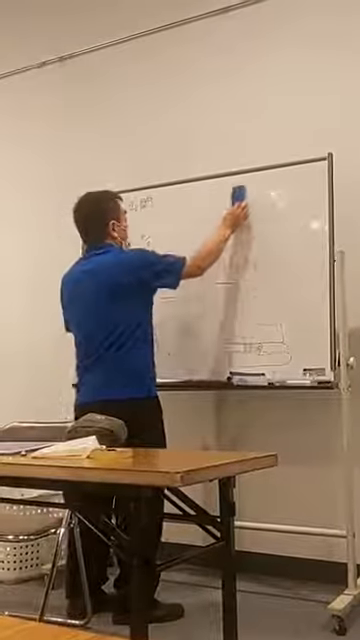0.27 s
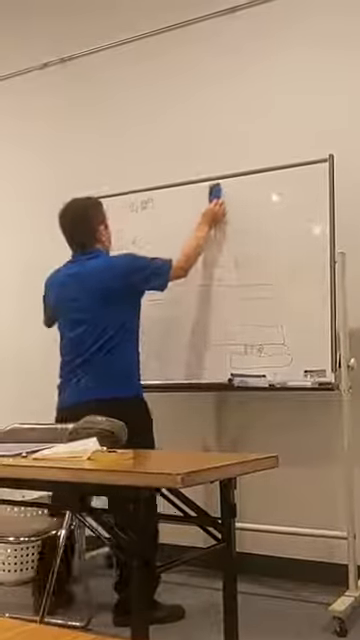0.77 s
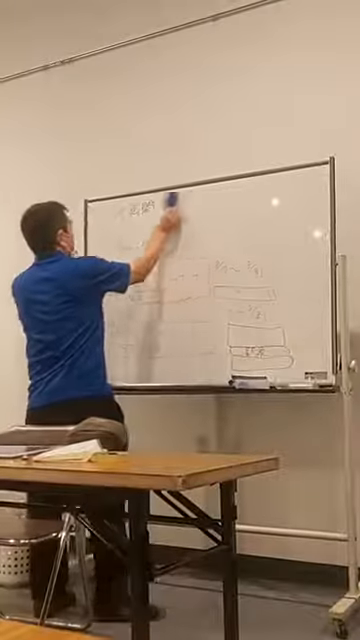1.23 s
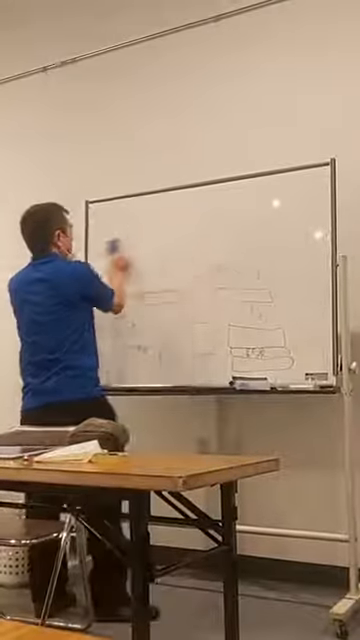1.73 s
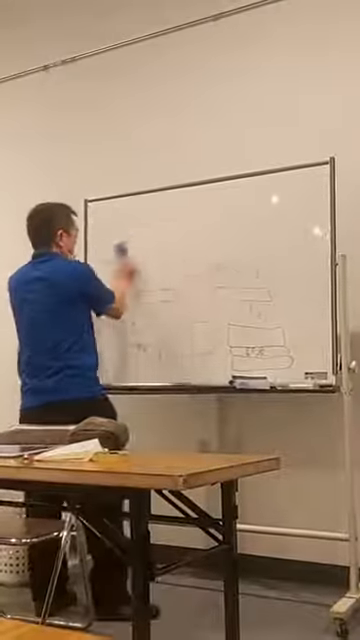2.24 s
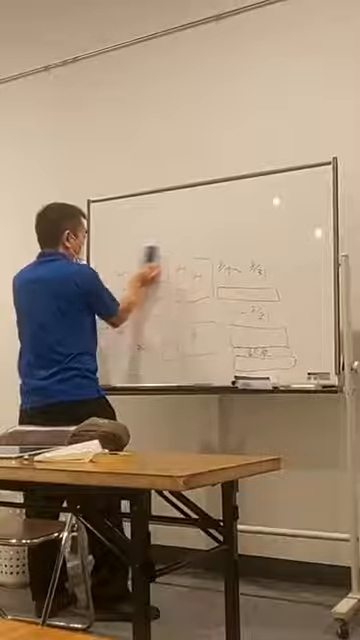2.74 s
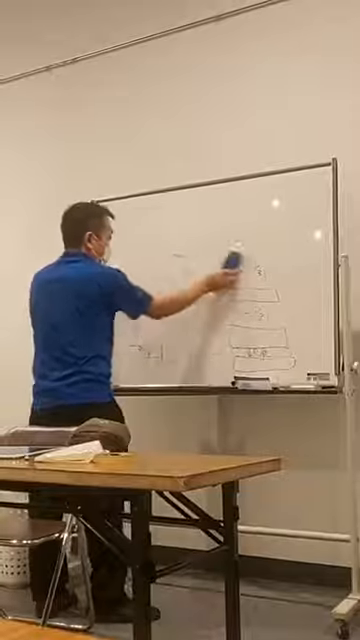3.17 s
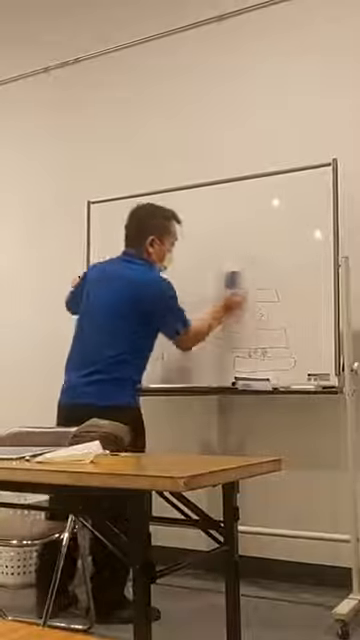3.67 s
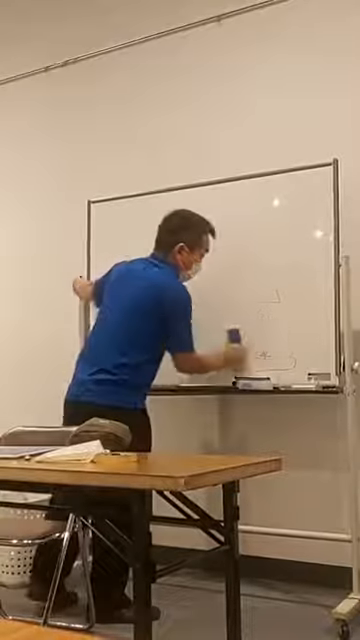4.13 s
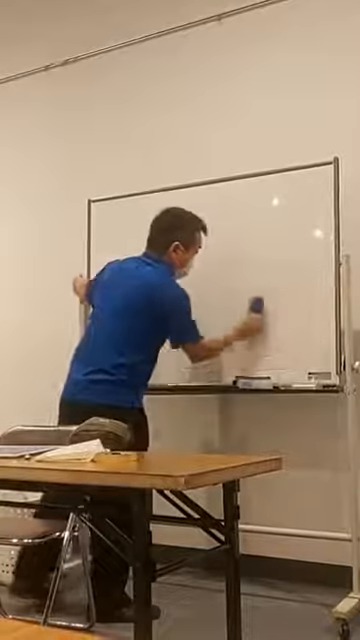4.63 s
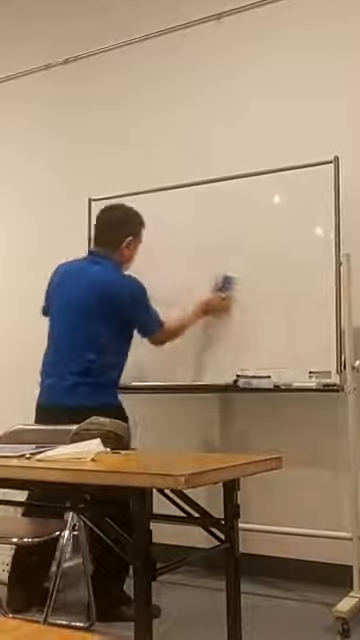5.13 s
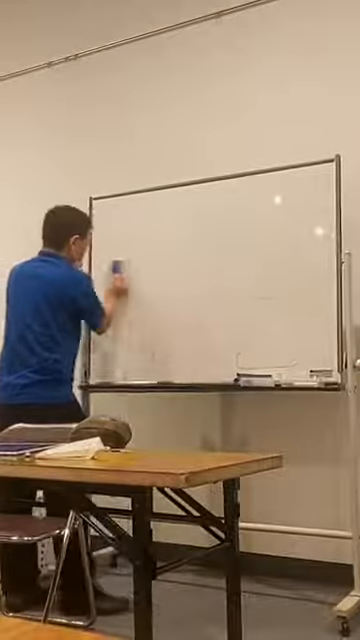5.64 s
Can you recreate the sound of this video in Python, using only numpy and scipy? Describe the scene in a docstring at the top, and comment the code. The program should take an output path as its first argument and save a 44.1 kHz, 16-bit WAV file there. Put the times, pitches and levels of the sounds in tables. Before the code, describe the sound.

Soft hissing strokes of an eraser on a whiteboard, broken by short, very high squeaks and light ticks over a low ventilation hum.

```python
"""Wiping a whiteboard

A felt eraser slaps onto a whiteboard and wipes to and fro, a few metres off in a bare, quiet meeting room.
The felt hisses with each stroke, the board thrums under it, and the eraser's hard edge ticks on the panel.
At the turns it sticks and slips in thin, very high squeaks that the hard walls draw out.
Ventilation rumble and mains hum sit below."""
import sys
import numpy as np
from scipy import signal
from scipy.fft import rfft, irfft
from scipy.io import wavfile

SR = 44100
rng = np.random.default_rng(int(sys.argv[2]) if len(sys.argv) > 2 else 0)


def generate_wav(signal):
    """Clip the signal to [-1, 1] and save it as 16-bit WAV at the path in sys.argv[1]."""
    frames = np.transpose(np.atleast_2d(signal))
    scaled = np.clip(frames, -1, 1) * 32767
    pcm = np.round(scaled).astype(np.int16)
    wavfile.write(sys.argv[1], SR, pcm)


N = 260190

# Stick-slip squeaks. Each row: start, swell and hold in seconds, peak level in dB, onset in dB below
# the peak, pitch in Hz at the onset, at the peak and at the end, pitch wobble in Hz.
SQUEAKS = [(1.350, 0.022, 0.087, -43, 16, 9390, 9220, 9220, 59),
           (1.743, .012, .004, -30, 14, 9950, 9930, 9870, 45),
           (1.758, 0.018, 0.039, -33.5, 12, 9700, 9000, 9060, 101.6),
           (2.085, 0.066, 0.069, -37, 8, 9120, 9220, 9020, 84),
           (2.460, .055, 0.0398, -35, 12, 9095, 9300, 8930, 79.4),
           (2.691, 0.029, .010, -69, 6.5, 1533, 1560, 1575, 60),
           (2.797, 0.039, 0.063, -34.5, 10.5, 9100, 9400, 9030, 96),
           (3.322, .020, .035, -62, 14, 7160, 7125, 7130, 32),
           (4.110, 0.056, 0.17, -69.5, 5, 1640, 1670, 1640, 58),
           (4.539, .025, 0.018, -71.5, 6, 1706, 1718, 1720, 45.4),
           (4.862, .010, 0.023, -49, 10, 9450, 9550, 9800, 160),
           (5.235, 0.078, 0.039, -39.5, 17.5, 9370, 9270, 9010, 81.6),
           (5.652, 0.0397, .020, -34.5, 17, 9330, 9200, 9380, 109),
           (5.725, 0.019, .035, -35.5, 12, 9120, 9050, 9100, 80.4)]
# The felt's hiss, riding the speed of the strokes. Each row: time in seconds, level in dB.
STROKE_LEVELS = [(0.8, -66), (1.0, -62), (1.01, -70), (1.54, -62.5), (1.74, -64.5), (1.75, -64),
                 (2.01, -65), (2.11, -64), (2.9, -63.5), (2.92, -60), (3.2, -67.5), (3.51, -64),
                 (3.58, -67.5), (3.68, -63), (3.75, -68), (3.8, -62.5), (4.08, -68), (4.11, -65.5),
                 (4.32, -63.5), (4.44, -74.5), (4.48, -65), (4.55, -65), (4.56, -63.5), (4.66, -72.5),
                 (4.78, -64.5), (5.05, -63), (5.22, -67), (5.3, -64), (5.37, -69.5), (5.49, -63),
                 (5.61, -70), (5.7, -63.5), (5.79, -62), (5.83, -69.5), (5.87, -58), (5.9, -60.5)]
# Slow faders around the hiss. Each row: time in seconds, board thrum and airy top in dB at median hiss.
LAYER_LEVELS = [(0, -66, -63), (.6, -66, -69.5), (.9, -70.5, -72.5), (1.5, -66, -67.5), (2.1, -69, -71.5),
                (2.8, -67.5, -70), (3.3, -73.5, -69.5), (4.1, -69.5, -71.5), (4.8, -71, -70.5),
                (5.5, -68.5, -71), (5.9, -70.5, -75)]
# Slaps and scuffs, the first slap rattling on. Each row: start in seconds, level in dB,
# decay time constant in ms, panel body in dB against the casing's crack.
KNOCKS = [(.285, -64, 15, -3), (0.345, -78, 18, 15), (.632, -48, 4, -12), (.636, -44.5, 10, -10),
          (.644, -36, 5.2, -17), (0.653, -38, 2.7, -10), (0.675, -51, 5, -3), (1.102, -60, 5.1, 5.5),
          (2.729, -58, 7, -4), (4.111, -55.5, 5.6, -17), (4.57, -55, 5.5, -16), (5.8644, -67, 6.8, -19)]
# The hard edge meeting the panel. Each row: time in seconds, casing level in dB, panel level in dB.
EDGE_TICKS = [(.8545, -46, -60), (2.303, -60, -55), (3.676, -56, -56), (.32, -64, -75), (.4344, -62, -75),
              (.99, -54, -67), (1.1294, -62, -58), (2.4625, -58, -51), (3.857, -57, -54)]
# What a tick sets ringing. Each row: frequency in Hz, gain in dB, seconds to fall by 60 dB.
CASING_MODES = [(2930, -12, 0.01), (4200, -7.5, 0.0092), (5300, -3, 0.0069), (7440, -13, .008),
                (10100, -22, 0.0045), (12400, -16, .005)]
PANEL_MODES = [(660, -11, 0.052), (860, -14, 0.071), (1014, -1.5, 0.036), (1345, 3.5, 0.011),
               (1524, -7, 0.068), (1780, -10.5, 0.048)]
# Tone colours of the noise layers. Each row: frequency in Hz, relative spectral density in dB.
RASP_COLOUR = [(8000, -20), (9600, 11), (10500, -13), (11100, 0), (11700, -16), (12500, -42)]  # brief high rasp as a squeak swells
FELT_COLOUR = [(1800, -20.5), (2300, -15.5), (3300, -11), (3800, -8), (4100, -3), (4450, -9.5), (5600, 2.5),
               (6200, -7), (6900, -17.5), (7800, -21), (9000, -30.5)]  # fibres rubbing on enamel
AIRY_COLOUR = [(6500, -24), (8000, -2.5), (10000, 5.5), (11500, 3), (12800, 7.5), (14000, -25.5),
               (15000, -20)]  # the sheen on top of the hiss
THRUM_COLOUR = [(120, -1.5), (250, -3), (500, -8), (900, -13), (1300, -3.5), (1650, -2), (1950, -16),
                (2600, -30.5)]  # the board under the strokes
CRACK_COLOUR = [(1180, -50), (2000, -18.5), (3950, -8.5), (4500, -8.5), (5610, 5.5), (7530, -24.5),
                (9710, -12), (12600, -21), (14200, -32)]  # the casing in a knock
BODY_COLOUR = [(280, -39), (450, 0), (650, 7), (1100, 1.5), (1600, 9.5), (2300, -23), (3000, -6)]  # the panel in a knock
VENT_COLOUR = [(18, -53), (30, -4), (91, -2.5), (117, -2), (144, -9), (207, -6.5), (415, -19.5),
               (1500, -23.5), (2100, -31.5), (5740, -28.5), (6880, -36), (12800, -38.5), (14200, -31.5)]  # moving air
# The duct's boom. Each row: time in seconds, level in dB.
RUMBLE_LEVELS = [(0, -70), (.8, -68), (1.6, -67.5), (2.6, -63.5), (3.2, -60.5), (4.498, -74), (5.9, -64)]
# Mains hum. Each row: frequency in Hz, rms level in dB, pitch wander in Hz.
HUM_LINES = [(101, -66.5, 2.93), (199.1, -73, 8)]
# Bounces off the nearest walls. Each row: delay in seconds, level in dB against the direct sound.
WALL_ECHOES = [(.014, -3.5), (.025, -6.5)]
# The room's main decay. Each row: frequency in Hz, seconds to fall by 60 dB.
ROOM_DECAY = [(1000, 0.3), (3000, 0.54), (6000, 0.2), (9500, 0.36), (14000, 0.13)]

HOLD_LOSS_DB, RELEASE_S, RELEASE_DB = 10, 0.025, 27  # a squeak sinks while it holds, then lets go
GLIDE_SHARE, ONSET_WOBBLE = 0.626, 0.71  # share of the hold spent gliding; share of wobble at the onset
HIGH_HZ, RASP_DB, OCTAVE_DB = 8000, -22, -20  # high squeaks get a rasp, lower ones an octave overtone
RASP_AT, RASP_FADE_S = 0.61, 0.017  # the rasp peaks at this share of the swell
LANDS_S, BEFORE_DB = 0.634, -80  # the felt meets the board; hiss level before that
THRUM_FOLLOWS, AIRY_FOLLOWS = 0.45, 1.02  # dB of movement for each dB of the hiss's swing
VENT_DB, RUMBLE_HZ, RUMBLE_WIDTH_HZ, RUMBLE_SWELL_DB = -62.5, 64.8, 24, 1.5
LATE_DB, LATE_STRETCH = -19, 3  # sound caught between the far walls starts weaker and lasts longer
FIRST_ECHO_S, SQUEAK_DRY_DB, KNOCK_SEND_DB, TICK_SEND_DB = 0.0069, -0.5, -5, -12
LOW_CUT_HZ, STOPBAND_HZ = 47.3, 14586


def squeaks():
    """Stick-slip tones: the pitch wobbles, the grip flutters, and the high ones rasp as they swell."""
    t, out = np.arange(N) / SR, np.zeros(N)
    wobble, flutter = drift(117), from_db(3.04 * drift(71))
    rasp = coloured(RASP_COLOUR, N)
    for start, swell, hold, peak_db, under_db, onset_hz, peak_hz, end_hz, wobble_hz in SQUEAKS:
        stages = start + np.cumsum([0, swell, hold, RELEASE_S])
        on = (t >= start) & (t < stages[-1])
        now, crest = t[on], start + swell
        level_db = peak_db - np.interp(now, stages, [under_db, 0, HOLD_LOSS_DB, HOLD_LOSS_DB + RELEASE_DB])
        glide = np.interp(now, [start, crest, crest + GLIDE_SHARE * hold], [onset_hz, peak_hz, end_hz])
        depth_hz = wobble_hz * np.interp(now, [start, crest], [ONSET_WOBBLE, 1])
        centred_wobble = wobble[on] - np.average(wobble[on], weights=from_db(2 * level_db))
        phase = 2 * np.pi * np.cumsum(glide + depth_hz * centred_wobble) / SR
        if peak_hz > HIGH_HZ:
            edge = from_db(RASP_DB) * rasp[on] * np.exp(-np.abs(now - start - RASP_AT * swell) / RASP_FADE_S)
        else:
            edge = from_db(OCTAVE_DB) * np.sin(2 * phase)
        grip = np.clip((now - start) / 0.0038, 0, 1)  # builds over a few ms
        out[on] += np.sqrt(2) * from_db(level_db) * flutter[on] * grip * (np.sin(phase) + edge)
    return out


def wiping():
    """Felt fibres hiss on the enamel while the panel thrums under the pressure; grit roughens the hiss."""
    t = np.arange(N) / SR
    grit_db = 0.91 * drift(6.7) + 1.26 * drift(18) + 0.67 * drift(440)
    hiss_db = np.where(t < LANDS_S, BEFORE_DB, np.interp(t, *np.transpose(STROKE_LEVELS)))
    swing_db = hiss_db - np.median(hiss_db)
    times, thrum_fader, airy_fader = np.transpose(LAYER_LEVELS)
    hiss = from_db(hiss_db + grit_db) * coloured(FELT_COLOUR, N)
    airy_db = np.interp(t, times, airy_fader) + AIRY_FOLLOWS * swing_db + grit_db
    airy = from_db(airy_db) * coloured(AIRY_COLOUR, N)
    thrum_db = np.interp(t, times, thrum_fader) + THRUM_FOLLOWS * swing_db + 0.42 * drift(39)
    return hiss + airy + from_db(thrum_db) * coloured(THRUM_COLOUR, N)


def knocks():
    """The eraser hits the board in short dying bursts: bright crack from the casing, dull panel body."""
    t, out = np.arange(SR // 8) / SR, np.zeros(N)
    for start, level_db, decay_ms, body_db in KNOCKS:
        noise = coloured(CRACK_COLOUR, len(t)) + from_db(body_db) * coloured(BODY_COLOUR, len(t))
        burst = from_db(level_db) * noise * np.exp(-1000 * t / decay_ms)
        at = round(start * SR)
        out[at:at + len(t)] += burst[:N - at]
    return out


def ticks():
    """The hard edge strikes: a sharp click from the casing over a short tock from the panel."""
    times, casing_db, panel_db = np.transpose(EDGE_TICKS)
    return struck(CASING_MODES, times, casing_db) + struck(PANEL_MODES, times, panel_db)


def struck(modes, hits_s, hits_db):
    """Every hit rings every mode, each with a slightly random strength."""
    out, at = np.zeros(N), np.round(hits_s * SR).astype(int)
    scatter_db = rng.normal(0, 1.3, (len(at), len(modes)))
    for i, (hz, gain_db, t60) in enumerate(modes):
        clicks = np.full(N, 1e-18)
        clicks[at] = (-1) ** i * from_db(hits_db + gain_db + scatter_db[:, i])  # modes alternate polarity
        radius, angle = from_db(-60 / (t60 * SR)), 2 * np.pi * hz / SR
        out += signal.lfilter([0, np.sin(angle)], [1, -2 * radius * np.cos(angle), radius ** 2], clicks)
    return out


def ventilation():
    """A steady bed of air noise with slightly wavering mains hum."""
    out = from_db(VENT_DB + 0.5 * drift(0.6)) * coloured(VENT_COLOUR, N)
    for hz, level_db, wander_hz in HUM_LINES:
        phase = 2 * np.pi * np.cumsum(hz + wander_hz * drift(3.98)) / SR
        out += np.sqrt(2) * from_db(level_db) * np.sin(phase)
    return out


def duct_rumble():
    """Noise booms in one broad duct resonance, swelling slowly."""
    edges_hz = [RUMBLE_HZ - RUMBLE_WIDTH_HZ / 2, RUMBLE_HZ + RUMBLE_WIDTH_HZ / 2]
    band = signal.butter(2, edges_hz, "band", fs=SR, output="sos")
    boom = unit_rms(signal.sosfilt(band, rng.standard_normal(N + SR))[SR:])
    level_db = np.interp(np.arange(N) / SR, *np.transpose(RUMBLE_LEVELS))
    return from_db(level_db + RUMBLE_SWELL_DB * drift(1.3)) * boom


def near_walls(direct):
    """The direct sound and its two clear early echoes."""
    out = direct.copy()
    for delay_s, level_db in WALL_ECHOES:
        lag = round(delay_s * SR)
        out[lag:] += from_db(level_db) * direct[:-lag]
    return out


def room_tail():
    """Dense echoes of bare walls: half-octave bands of noise, each dying at its own rate; energy 1."""
    t, tail = np.arange(SR) / SR, 0
    for hz in 500 * 2 ** np.arange(0, 5, 0.5):
        band = signal.butter(2, [hz, hz * np.sqrt(2)], "band", fs=SR, output="sos")
        fall_db = -60 * t / at_hz(ROOM_DECAY, hz * 2 ** 0.25)
        decay = from_db(fall_db) + from_db(LATE_DB + fall_db / LATE_STRETCH)
        tail += signal.sosfilt(band, rng.standard_normal(SR)) * decay
    fade_in = np.clip(t / FIRST_ECHO_S - 1, 0, 1)
    return unit_rms(tail * fade_in) / np.sqrt(SR)


def coloured(colour, size):
    """Noise with the given tone colour, rms 1."""
    hz = np.fft.rfftfreq(size, 1 / SR) + 1
    return unit_rms(irfft(rfft(rng.standard_normal(size)) * from_db(at_hz(colour, hz)), size))


def drift(rate_hz):
    """A smooth random modulator: noise twice through a one-pole low-pass, rms 1."""
    pole = np.exp(-2 * np.pi * rate_hz / SR)
    return unit_rms(signal.lfilter([1], [1, -2 * pole, pole * pole], rng.standard_normal(N + SR))[SR:])


def at_hz(curve, hz):
    """Read a curve along a log-frequency axis."""
    points_hz, values = np.transpose(curve)
    return np.interp(np.log(hz), np.log(points_hz), values)


def from_db(db):
    return 10 ** (np.asarray(db) / 20)


def unit_rms(x):
    return x / np.sqrt(np.mean(x ** 2) + 1e-20)


def scene():
    """The mix: squeaks, knocks and ticks feed the reverb; wiping and room tone are already diffuse."""
    tail, squeak, knock, tick = room_tail(), squeaks(), knocks(), ticks()
    send = squeak + from_db(KNOCK_SEND_DB) * knock + from_db(TICK_SEND_DB) * tick
    reverb = signal.fftconvolve(send, tail)[:N]
    accents = from_db(SQUEAK_DRY_DB) * near_walls(squeak) + knock + tick
    return (accents + reverb + wiping() + ventilation() + duct_rumble())[None]


def record(dry):
    """The small microphone drops the deep bass; the top is cut steeply."""
    low_cut = signal.butter(4, LOW_CUT_HZ, "high", fs=SR, output="sos")
    high_cut = signal.cheby2(14, 50, STOPBAND_HZ, fs=SR, output="sos")
    return signal.sosfilt(high_cut, signal.sosfilt(low_cut, dry))


dry = scene()
out = record(dry)
generate_wav(out)
```